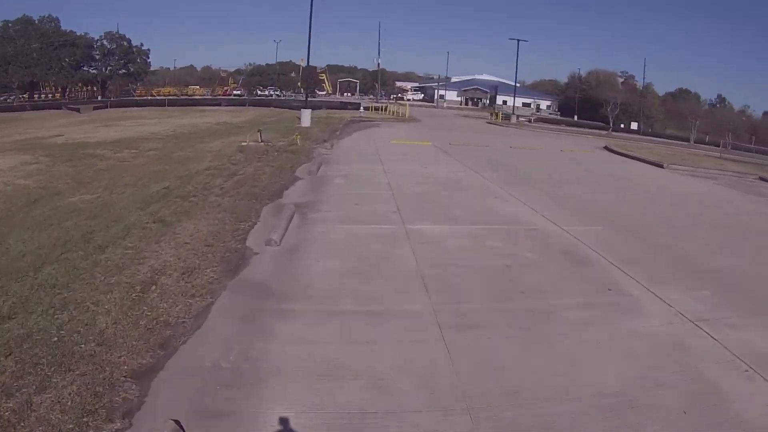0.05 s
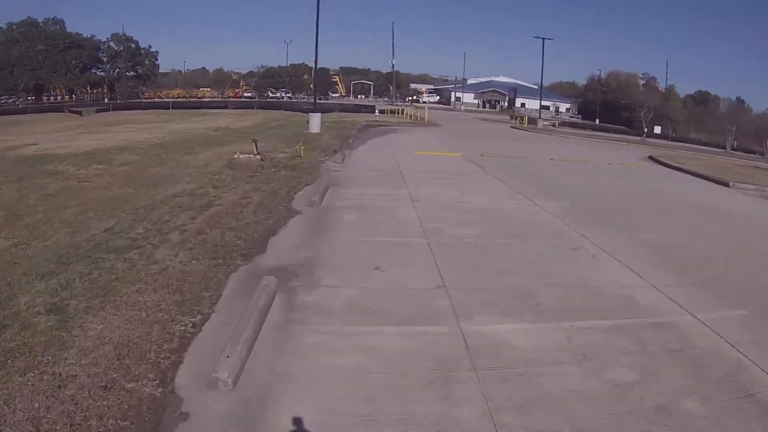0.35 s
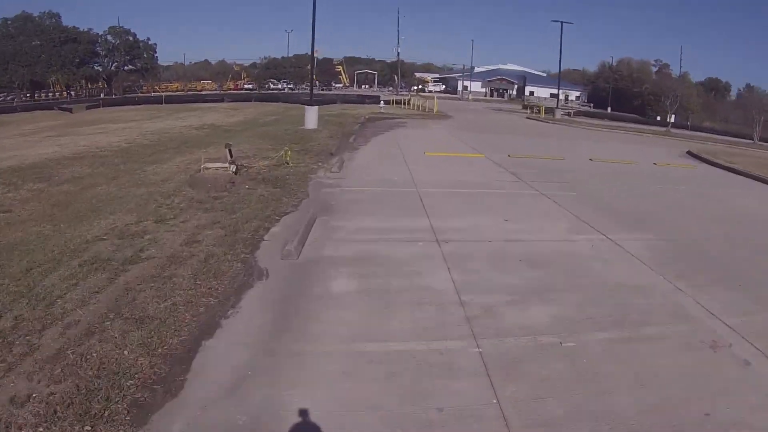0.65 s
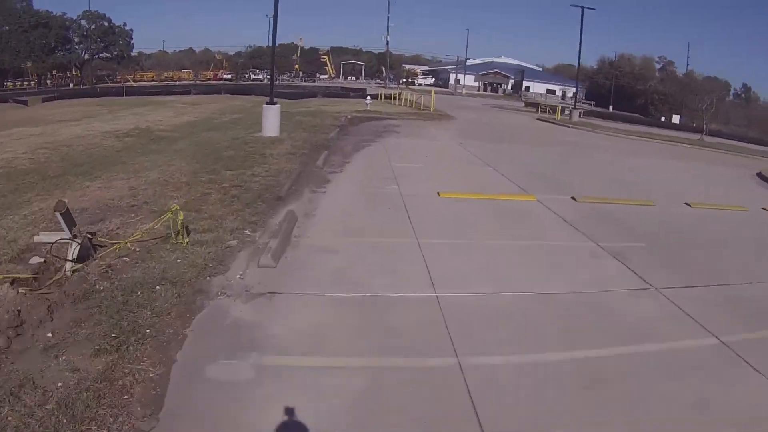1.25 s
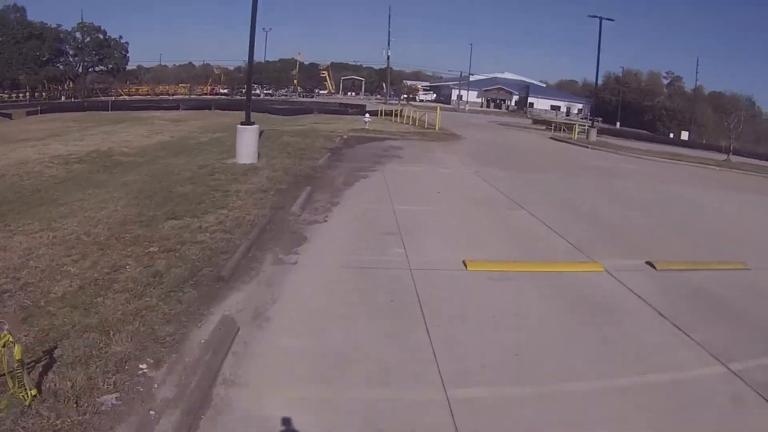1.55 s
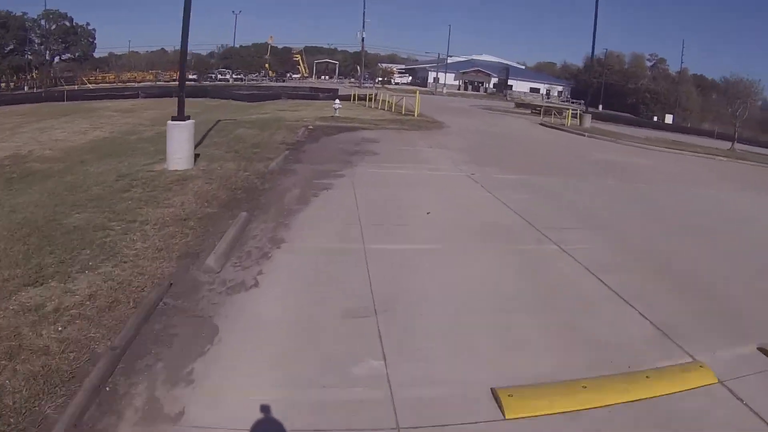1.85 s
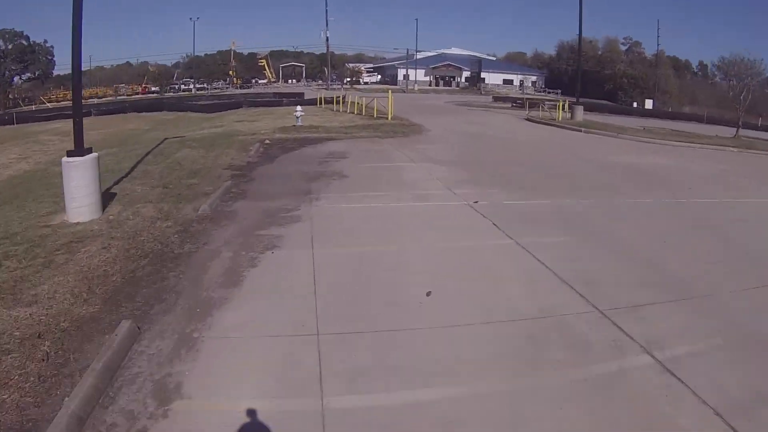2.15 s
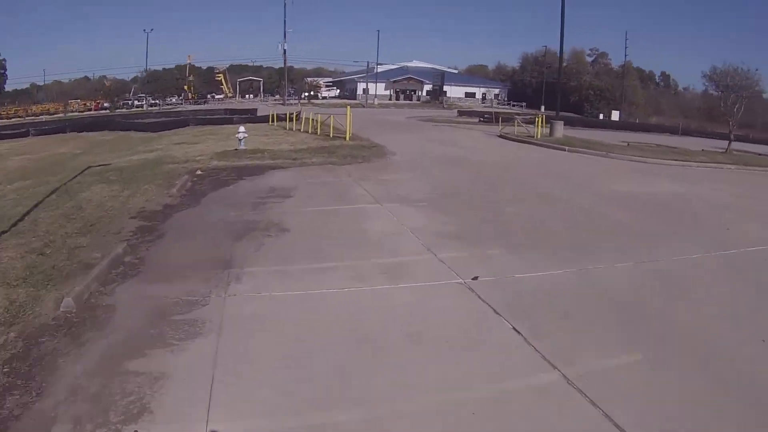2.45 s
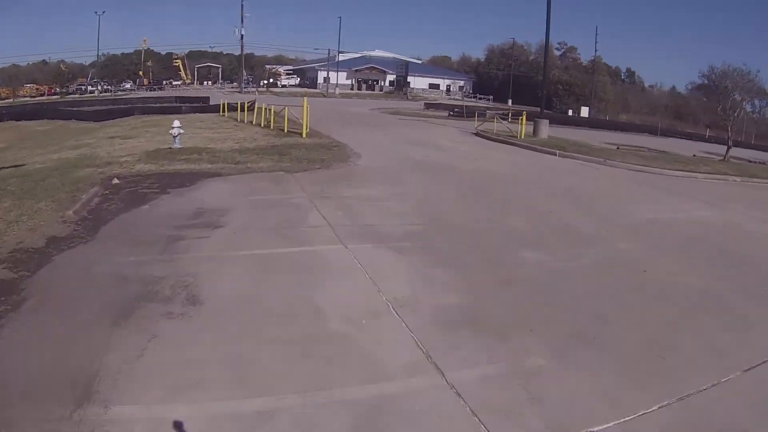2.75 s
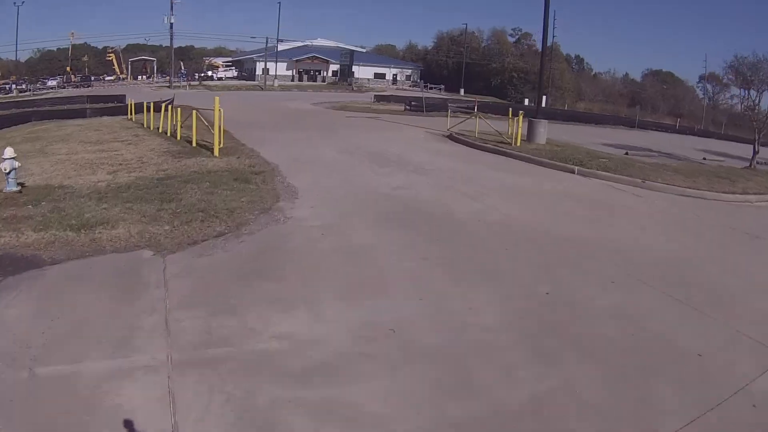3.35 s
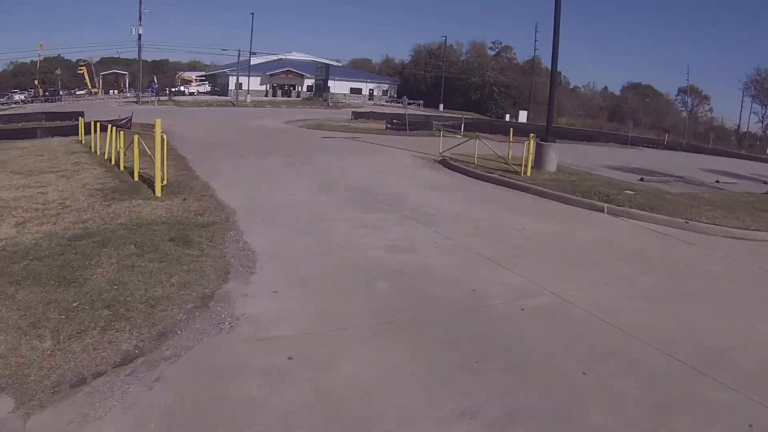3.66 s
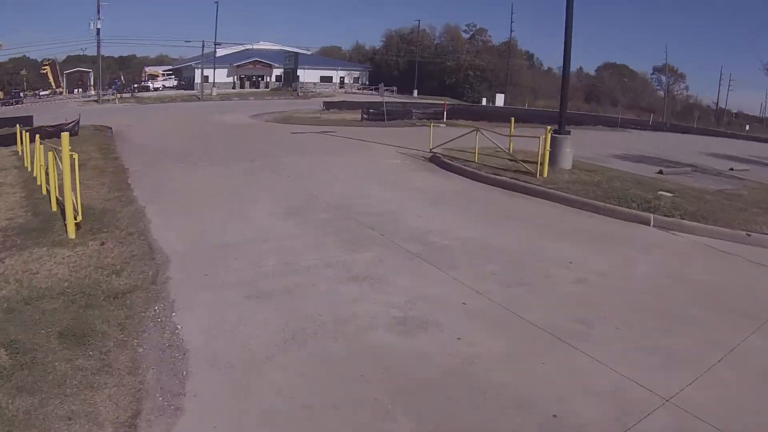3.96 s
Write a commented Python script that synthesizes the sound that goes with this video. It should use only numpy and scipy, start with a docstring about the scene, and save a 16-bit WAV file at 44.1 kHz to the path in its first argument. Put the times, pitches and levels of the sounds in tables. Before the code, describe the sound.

A skateboard whirs along concrete in buffeting wind, clacking once across a joint.

```python
"""Outdoors on concrete, the microphone within arm's reach, on a camera carried by a fast skateboarder.
From the start wind rumbles and flutters on the microphone; under it rough paving shakes the board
into a whirr, rings, a boom and a hiss. Sharp eddies and slow buffets soon hit, then return unevenly.
At 1.2 s the hiss briefly swells; at 1.8 s the wheels clack across a joint and the board
shudders. Wind and wheels ease off towards the end."""
import sys
import numpy as np
from scipy.fft import rfft, irfft, next_fast_len
from scipy.io import wavfile
from scipy.ndimage import map_coordinates

SR = 44100
rng = np.random.default_rng(int(sys.argv[2]) if len(sys.argv) > 2 else 0)


def generate_wav(sig):
    """Save sig (samples, or channels by samples) to the path in sys.argv[1] as 16-bit PCM at SR."""
    pcm = np.round(np.clip(np.atleast_2d(sig).T, -1, 1) * 32767).astype(np.int16)
    wavfile.write(sys.argv[1], SR, pcm)


N = 176400
TIME_S = np.arange(N) / SR


def amp(db):
    """Decibels to gain."""
    return 10 ** (np.asarray(db) / 20)


def unit(x):
    """Scale to rms 1."""
    return x / np.sqrt(np.mean(x ** 2) + 1e-20)


def curves(rows):
    """One value per sample for each column after the time."""
    times, *columns = np.transpose(rows)
    return [np.interp(TIME_S, times, column) for column in columns]


def wobble(knots_per_s):
    """A smooth random curve."""
    return map_coordinates(rng.standard_normal(4096), [TIME_S * knots_per_s], mode="wrap")


def swell(centre_s, width_s):
    """A bell-shaped rise and fall around one moment."""
    return np.exp(-((TIME_S - centre_s) / width_s) ** 2)


def filtered(x, response):
    """x times a complex response of frequency."""
    size = next_fast_len(N + SR // 2)
    return irfft(rfft(x, size) * response(np.fft.rfftfreq(size, 1 / SR)), size)[:N]


def coloured(x, spectrum):
    """x through a spectrum of (Hz, dB) points, at rms 1."""
    hz, db = np.transpose(spectrum)
    return unit(filtered(x, lambda f: amp(np.interp(np.log(f + 1), np.log(hz), db))))


def resonance(f, pitch_hz, width_hz):
    """The response of a resonance with steep skirts."""
    band = 1j * f * width_hz / (pitch_hz ** 2 - f ** 2 + 1j * f * width_hz)
    return band * np.sqrt(np.abs(band))


# Wind right on the microphone: time_s, flutter_db, rumble_db
WIND_LEVELS = [(0, -17, -11.5), (.15, -14.5, -25), (.23, -21, -20), (.6, -19.5, -25), (1.04, -18, -20.5),
               (1.2, -19.5, -22.5), (1.55, -18.5, -24), (1.7, -17.5, -21), (1.85, -19.5, -22),
               (2.2, -19, -27.5), (2.4, -20.5, -28.5), (2.55, -21, -24.5), (2.8, -20.5, -23.5),
               (3.05, -20.5, -27), (3.25, -24, -26.5), (3.42, -24, -27.5), (3.7, -24, -24.5),
               (4, -24.5, -24)]
# Spectra of its rumble and its flutter: frequency_hz, relative_db
RUMBLE_SPECTRUM = [(10, -19.5), (22, -13), (35, 1), (60, 0), (100, -3), (150, -10), (300, -26.5),
                   (900, -86)]
FLUTTER_SPECTRUM = [(40, -22.5), (100, 0.5), (170, 0), (230, -3), (285, -1.5), (390, -4.5), (500, -3.5),
                    (610, -4), (720, -11), (900, -21.5), (1150, -29), (1600, -42), (4000, -87)]

def wind():
    """Air rushing over the microphone makes a deep rumble and a lumpy flutter."""
    flutter_db, rumble_db = curves(WIND_LEVELS)
    rumble = coloured(rng.standard_normal(N) * amp(0.29 * wobble(27)), RUMBLE_SPECTRUM)
    flutter = coloured(rng.standard_normal(N) * amp(1.04 * wobble(240)), FLUTTER_SPECTRUM)
    return amp(rumble_db) * rumble + amp(flutter_db) * flutter


def paving(grains_per_s=2600, grit_share=0.34):
    """The force under the wheels: single grains of grit and fine roughness."""
    grains = (rng.random(N) < grains_per_s / SR) * rng.standard_normal(N)
    grain_db = 2 * np.minimum(rng.exponential(size=N), 4)
    grit = unit(grains * amp(grain_db))
    return np.sqrt(grit_share) * grit + np.sqrt(1 - grit_share) * rng.standard_normal(N)


# Whirr of the wheels, a rider's height or so from the microphone: frequency_hz, relative_db
WHIRR_SPECTRUM = [(300, -19.5), (900, -7.5), (1150, -14), (1550, -11), (1750, -7), (2050, -6.5), (2300, -2),
                  (2650, 0), (3050, -3.5), (3250, -7.5), (3430, -3), (3580, -11), (3830, -11),
                  (4020, -24.5), (5000, -32.5), (9000, -76)]

def wheel_whirr(level_db, bright_above_hz=2960):
    """Paving shakes the wheels into an uneven whirr, brighter as the rolling grows louder."""
    patches = amp(0.13 * wobble(16) + 0.33 * wobble(130))
    whirr = coloured(paving(), WHIRR_SPECTRUM)
    treble = filtered(whirr, lambda f: f ** 8 / (f ** 8 + bright_above_hz ** 8))
    treble_gain = amp(level_db - level_db.mean())
    return patches * (whirr + treble * (treble_gain - 1))


# Narrow resonances of wheels and trucks: pitch_hz, width_hz, relative_db
TRUCK_MODES = [(1302, 140, -1.3), (2317, 68, -0.5), (2570, 87, -2), (2903, 78, -4), (3830, 85, -12),
               (4430, 42, -20.5), (4750, 100, -25), (5450, 110, -27), (6170, 90, -22.5)]
# Rough spots that rattle the trucks: centre_s, boost_db
ROUGH_SPOTS = [(.075, 3.5), (.148, 6.5), (1.07, 4)]

def truck_rings(wander_db=2, rattle_below_hz=1800):
    """Each ring comes and goes with the load on the wheels; the lowest swells on rough spots."""
    rattle_db = sum(db * swell(s, width_s=0.026) for s, db in ROUGH_SPOTS)
    force = paving()
    rings, gains = [], []
    for hz, width_hz, db in TRUCK_MODES:
        rings.append(amp(db) * filtered(force, lambda f: resonance(f, hz, width_hz)))
        gains.append(amp(wander_db * wobble(14) + rattle_db * (hz < rattle_below_hz)))
    return sum(gain * ring for gain, ring in zip(gains, rings)) / np.std(sum(rings))


# Boom of the deck under the rider's feet: time_s, over_whirr_db
DECK_LEVELS = [(0, 8), (1.2, 7), (2.2, 15), (2.8, 7.5), (3.3, 3), (4, -2)]

def deck_boom():
    """The paving drives the deck's low resonance."""
    deck_db, = curves(DECK_LEVELS)
    boom = filtered(paving(), lambda f: resonance(f, pitch_hz=175, width_hz=123) ** 2)
    return amp(deck_db) * unit(boom)


# Hiss from down at the concrete: frequency_hz, relative_db
HISS_SPECTRUM = [(2500, -19), (4100, 2.5), (4900, -1.5), (5500, 2), (6400, -6.5), (7200, -6.5),
                 (7700, -10.5), (8600, -6.5), (9300, -15), (9850, -19.5), (10400, -15.5), (11400, -21.5),
                 (13000, -23.5), (14300, -32)]

def wheel_hiss():
    """The wheels hiss on the paving, with one brief swell."""
    swell_db = 4 * swell(centre_s=1.2, width_s=0.022)
    return amp(swell_db + 0.5 * wobble(40)) * coloured(paving(), HISS_SPECTRUM)


# The rolling board as it reaches the microphone: time_s, whirr_db, hiss_db
ROLL_LEVELS = [(0, -36, -50), (.3, -39.5, -55.5), (.53, -40, -57), (.8, -38.5, -54.5), (1.05, -36, -51.5),
               (1.18, -37.5, -56.5), (1.4, -36, -53), (1.7, -36, -52.5), (2, -37, -56),
               (2.17, -38.5, -56.5), (2.32, -38.5, -57.3), (2.48, -37.5, -55), (2.68, -38.5, -56),
               (2.82, -38, -53.5), (3.0, -39, -58.5), (3.23, -42, -61.5), (3.55, -40.5, -61),
               (4, -40.5, -58.5)]

def rolling_board(rings_db=-6):
    """Whirr, rings and boom follow one rolling level; the faint hiss has its own."""
    whirr_db, hiss_db = curves(ROLL_LEVELS)
    body = wheel_whirr(whirr_db) + amp(rings_db) * truck_rings() + deck_boom()
    return amp(whirr_db) * body + amp(hiss_db) * wheel_hiss()


# Sharp eddies and slow buffets of air on the microphone: centre_s, peak_db, pitch_hz
SHARP_EDDIES = [(.142, -5, 444), (.149, -7.5, 231), (.159, -13, 550), (.170, -12, 195), (.186, -18, 450),
                (.1948, -5, 288), (.2163, -3.5, 380), (.2495, -4, 420), (.524, -14, 380), (.821, -8.5, 260),
                (1.066, -5.5, 262), (1.135, -8, 370), (1.764, -14, 219), (1.772, -10.5, 166),
                (1.793, -7.5, 152), (1.8035, -5.5, 257), (1.869, -5, 322), (1.973, -13, 340),
                (2.24, -6.5, 305), (2.418, -9.5, 380), (2.446, -13, 415), (3.357, -17, 343),
                (3.702, -11, 386)]
SLOW_BUFFETS = [(.16, -12, 69.4), (.39, -9, 75), (.53, -12, 77), (.83, -17, 56.3), (.94, -11, 55),
                (1.07, -9, 66), (1.23, -12, 70), (1.41, -10, 60), (1.52, -15, 45), (1.935, -8, 110),
                (2.17, -10.5, 53), (2.77, -13, 39), (3.04, -13, 88), (3.72, -15, 66)]

def air_hits(rows, half_length_cycles):
    """Each eddy or buffet is one short swing of air pressure, suction then push."""
    pressure = np.zeros(N)
    for centre_s, peak_db, pitch_hz in rows:
        cycles = (TIME_S - centre_s) * pitch_hz
        envelope = 1 / np.cosh(np.clip(2 * cycles / half_length_cycles, -20, 20))
        swing = envelope * np.sin(2 * np.pi * cycles)
        pressure += amp(peak_db) * swing / np.abs(swing).max()
    return pressure


# Ringing of the board as it strikes a joint in the concrete: pitch_hz, relative_db, t60_s
CLACK_MODES = [(850, 2.5, 0.017), (1755, -3.5, 0.017), (2790, -1, 0.01), (3480, -3, 0.0075),
               (4360, -11, 0.0073), (5200, -17, .005)]

def joint_clack(start_s=1.7802, clack_db=-10.5, shudder_db=-23.5, shudder_t60_s=1):
    """One dry clack as the wheels cross a joint, then a low shudder of the board."""
    t = np.maximum(TIME_S - start_s, 0)
    ring = sum(amp(db - 60 * t / t60_s) * np.sin(2 * np.pi * hz * t) for hz, db, t60_s in CLACK_MODES)
    attack = 1 - np.exp(-(t / 0.001) ** 2)
    shudder = unit(filtered(paving(), lambda f: resonance(f, pitch_hz=192, width_hz=140) ** 2))
    rise = 1 - np.exp(-t / 0.014)
    return amp(clack_db) * attack * ring + amp(shudder_db - 60 * t / shudder_t60_s) * rise * shudder


def scene():
    """Wind on the microphone over the board rolling below it, in the open, in mono."""
    ride = wind() + rolling_board()
    eddies = air_hits(SHARP_EDDIES, half_length_cycles=0.47)
    buffets = air_hits(SLOW_BUFFETS, half_length_cycles=0.65)
    return (ride + eddies + buffets + joint_clack())[None]


def record(dry):
    """The camera keeps nothing above 14.3 kHz."""
    return filtered(dry[0], lambda hz: hz < 14300)[None]


dry = scene()
out = record(dry)
generate_wav(out)
```